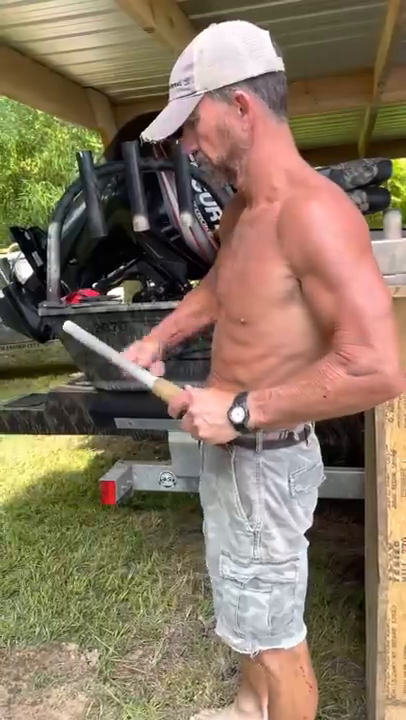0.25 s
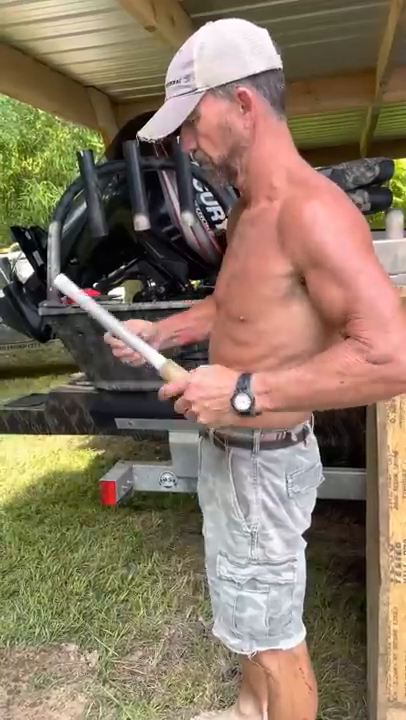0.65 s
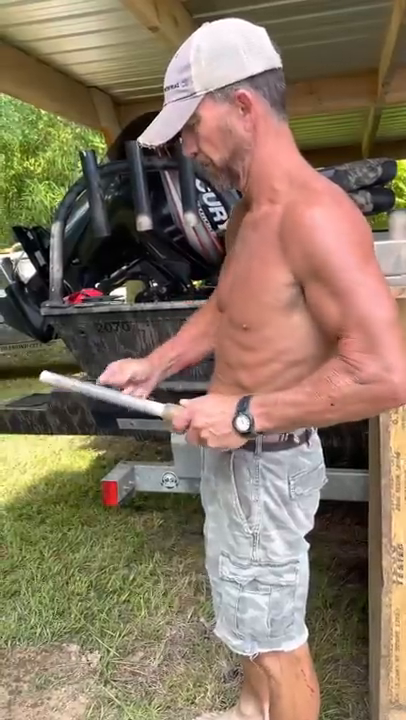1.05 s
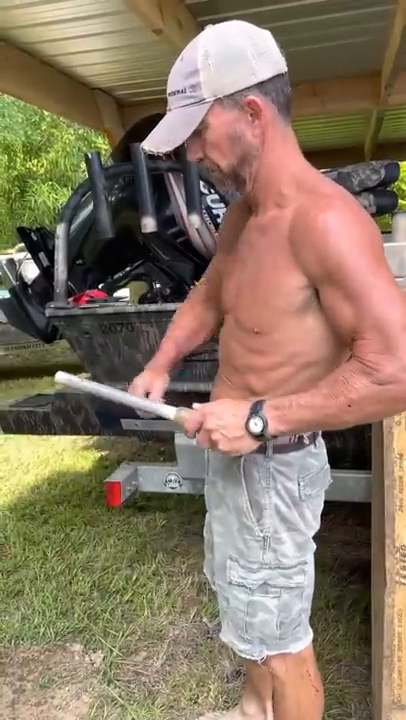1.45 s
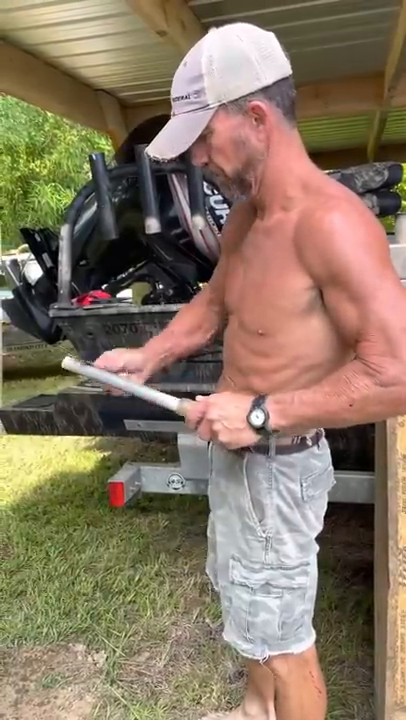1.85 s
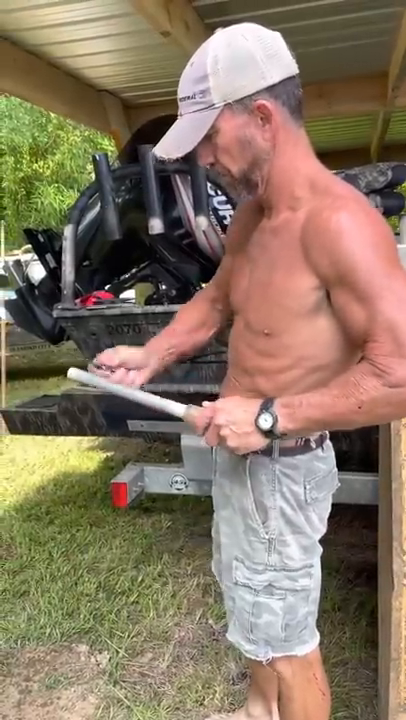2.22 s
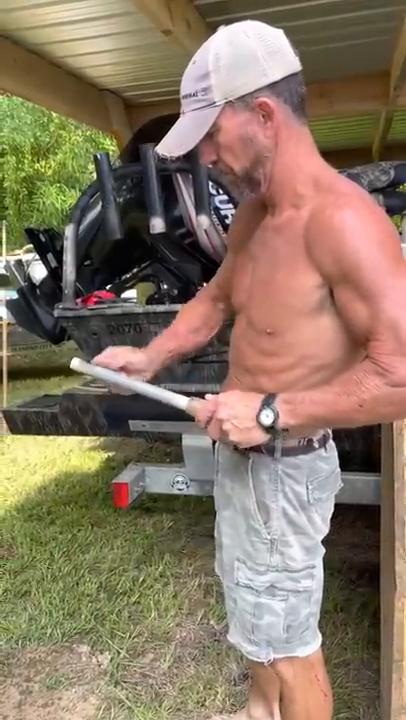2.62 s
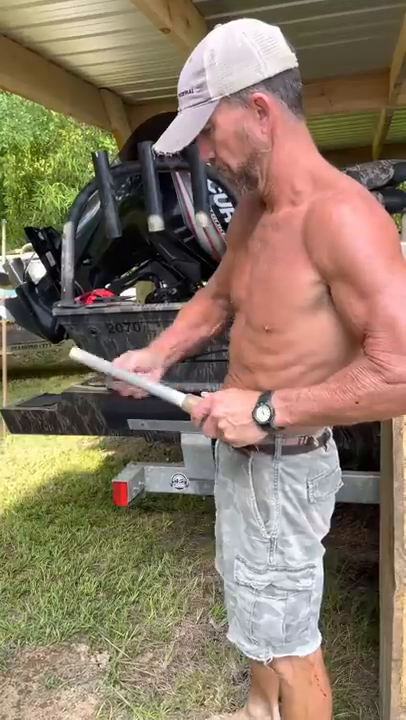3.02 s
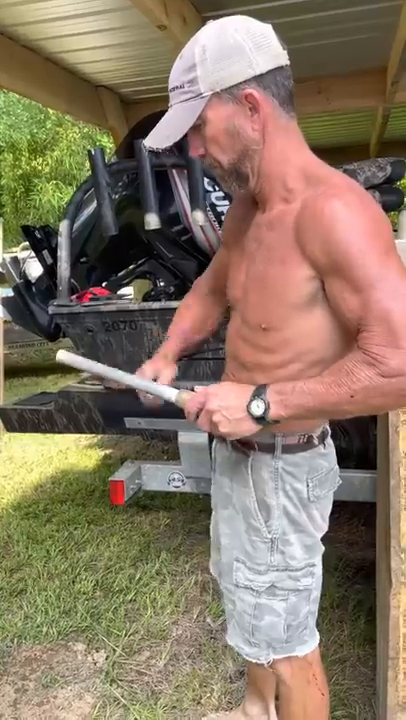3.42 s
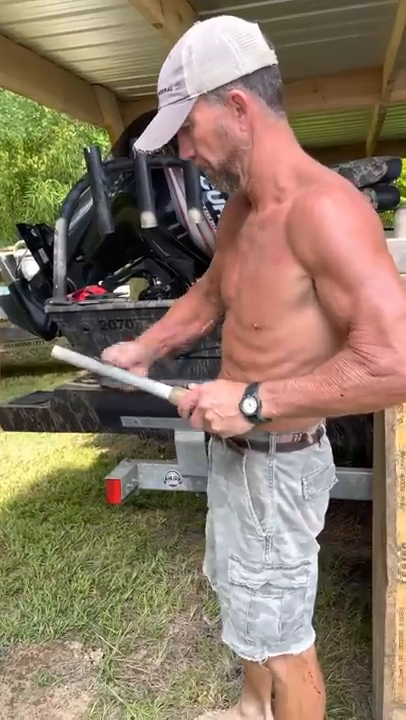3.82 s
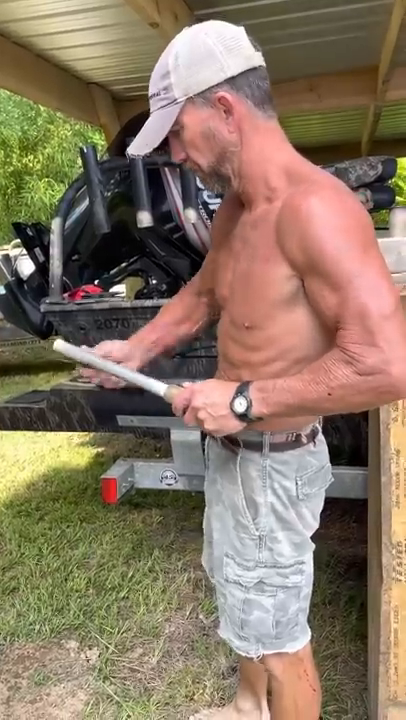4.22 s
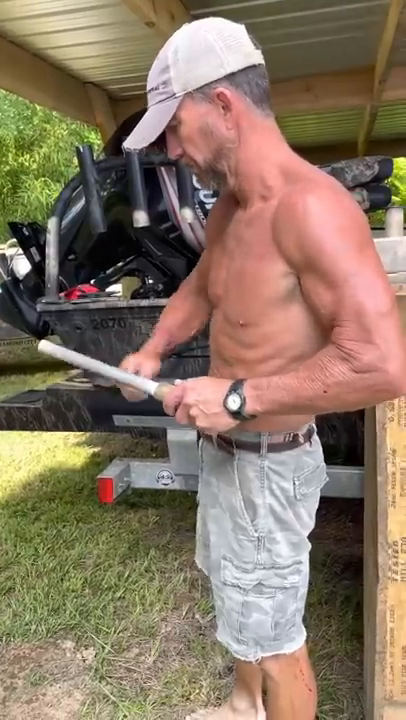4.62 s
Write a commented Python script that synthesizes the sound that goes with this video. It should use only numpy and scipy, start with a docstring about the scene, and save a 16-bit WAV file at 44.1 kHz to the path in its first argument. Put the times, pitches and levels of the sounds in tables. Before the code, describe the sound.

Close metallic honing: bright scrapes and raspier return strokes with small steel clinks, an early pause with bird chirps, then steady rhythm.

```python
"""A knife is honed on a hand-held rod under a carport roof, about three strokes a second.
The blade clinks onto the rod (blow and ringing modes), scrapes along it and is drawn back with
a longer rasp (uneven noise through moving resonances). Small birds call from the trees as gliding
sines, over filtered-noise air and rumble, a faint sine hum, soft low bumps and a thin sizzle."""
import sys
import numpy as np
from scipy import signal
from scipy.fft import rfft, irfft
from scipy.io import wavfile
from scipy.ndimage import uniform_filter1d

SR = 44100
rng = np.random.default_rng(int(sys.argv[2]) if len(sys.argv) > 2 else 0)


def store_pcm(level_fs):
    """Save levels as 16-bit WAV."""
    pcm = np.round(np.clip(level_fs, -1, 1) * 32767).astype(np.int16)
    wavfile.write(sys.argv[1], SR, np.atleast_2d(pcm).T)


N = 214715
TIME_S = np.arange(N) / SR

# outdoor air spectrum: (frequency [Hz], relative density [dB per Hz])
AIR_SPECTRUM = [(15, -50.5), (25, -52.5), (114, -2), (217, -4.5), (344, -11), (1130, -24), (1440, -21),
                (1890, -23), (2480, -25.5), (2910, -28.5), (3340, -26), (3720, -23.5), (4740, -37),
                (11600, -42.5), (16000, -102)]
# hum lines: (frequency [Hz], level [dB])
HUM_LINES = [(236, -70), (295, -70.5), (587, -88)]
# low rumble level, which dips briefly near 1.6 s: (time [s], relative level [dB])
RUMBLE_LEVEL = [(0, -56), (.3, -68), (1.15, -65.5), (1.5, -73.5), (1.63, -105), (1.78, -70), (2.8, -64),
                (4.2, -70.5), (4.35, -61), (4.86, -64.5)]
# blade pushed along the rod: (start [s], speeding up [s], slowing down [s], relative level [dB],
# relative fizz [dB], relative low rasp [dB], blade resonance [Hz])
PUSH_STROKES = [ (0.091, 0.0073, 0.034, -47.5, 7, -1.5, 2410), (1.089, 0.018, 0.088, -51, -1, 7, 2266),
                (1.482, 0.007, 0.01, -42, 7.5, -7.5, 2345), (1.502, 0.04, .02, -44, -12.5, 5.5, 2450),
                (1.768, 0.044, 0.045, -37.5, -3.5, -10.5, 2185),
                (2.306, 0.017, 0.034, -41.5, -10.5, -7, 2007),
                (2.587, 0.0025, 0.018, -50.5, -2.5, -5, 1900), (2.863, 0.017, 0.036, -52, 3, -7.5, 2400),
                (3.188, 0.0075, 0.045, -35, 1.5, -4.5, 2280), (3.486, 0.024, 0.034, -34, -1, -1, 2416),
                (3.783, 0.05, 0.016, -32.5, 1, -2.5, 2033), (4.1, 0.029, 0.014, -35, -4.5, 3, 2390),
                (4.394, 0.018, 0.044, -32, 1.5, -1.5, 2052), (4.711, 0.015, 0.041, -50, 4, 5, 2400), ]
# blade drawn back: columns as PUSH_STROKES
PULL_STROKES = [ (0.0, .004, 0.007, -49.5, -7.5, 11, 2440), (0.166, 0.095, 0.03, -35, -4, 2.5, 2493),
                (1.256, 0.071, 0.055, -37.5, -3, -1, 2250), (1.587, 0.071, 0.057, -35.5, -5, 0, 2625),
                (1.892, 0.078, 0.066, -36.5, -2, -3, 2230), (2.05, 0.037, 0.0042, -40.5, 11.5, -1, 2450),
                (2.386, 0.059, 0.0095, -44, 5.5, -7.5, 2260),
                (2.618, 0.081, 0.048, -35.5, -3.5, -0.5, 2254), (2.952, 0.084, 0.058, -36.5, -4, -1, 2524),
                (3.28, 0.086, 0.039, -36.5, -1.5, -1, 2280), (3.58, 0.082, 0.059, -35, -5.5, -2.5, 2555),
                (3.88, 0.09, 0.042, -36.5, -2.5, 2, 2600), (4.194, 0.083, 0.041, -35, -5, 2.5, 2580),
                (4.487, .088, 0.04, -35.5, -3, 3.5, 2715), (4.792, 0.076, 0.018, -38.5, -5.5, 4, 2610), ]
# stroke at first contact and at lift-off, against its fastest moment:
# (level [dB], fizz [dB], low rasp [dB], blade resonance [ratio])
PUSH_ENDS = [(-5, -6.5, 4, 1.2), (-5, -8, 1, 1.14)]
PULL_ENDS = [(-25, -17.5, 10.5, 0.95), (-8, 6.5, -7.5, 0.972)]
# steel spectrum in each direction and under a blow: (frequency [Hz], relative density [dB per Hz])
PUSH_SPECTRUM = [(350, -39.5), (700, -43.5), (1300, -15.5), (1750, -25), (2100, -4), (2600, -2),
                 (3000, -10), (3950, 1.5), (4500, -8.5), (6600, -10.5), (8300, 0), (10000, -8),
                 (12000, -10), (13000, -47.5), (16000, -47)]
PULL_SPECTRUM = [(350, -53), (950, -29.5), (1500, -10.5), (1850, -15), (2400, 4), (3000, -5), (3800, 1),
                 (4600, -8), (6600, -14.5), (8500, -4), (10000, -10), (11900, -17.5), (13000, -53),
                 (16000, -37)]
CLINK_SPECTRUM = [(200, -33.5), (700, -27), (1100, -14), (1700, -23.5), (2300, 1.5), (3000, -17.5),
                  (3950, -1), (5000, -7.5), (6700, -7.5), (8400, 8), (9400, 6.5), (10300, 1.5),
                  (12000, -11), (13500, -24.5), (16000, -34)]
# resonances gliding with the contact point: (ratio to the lowest blade resonance, width [Hz],
# level [dB], extra glide [octaves per s])
PUSH_GLIDES = [(1, 140.4, -4, 0), (1.8, 177.4, -26, 1), (3.8, 400, -7.5, 1)]
PULL_GLIDES = [(1, 224, -1.5, 0), (1.45, 285, -15, 5.5), (2.198, 439, -17.5, -0.5), (3.4, 604, -39.5, 8.5)]
# modes of blade and rod: (nominal frequency [Hz], relative level [dB], t60 [s])
STEEL_MODES = [(1152, -36, .05), (1950, -31, .09), (2180, -19.5, 0.063), (3746, 1.5, 0.039),
               (4206, 12.5, 0.013), (5030, -35, 0.064), (7340, -4, .06), (8000, -17, .07), (8190, -26, .07),
               (8050, -2, 0.033), (8150, 5, 0.087), (9500, -3, 0.047), (11200, 9.5, 0.051)]
# blade lands on the rod: (time [s], relative strength [dB], then against the bright ping:
# mid ring [dB], low ring [dB], knock [dB])
CLINK_EVENTS = [(.090, -12, 1, 5, 1), (1.0877, -16.5, 0.5, 15.5, -16), (1.4805, -23, 10.5, 5.5, 12),
                (1.762, -19.5, 7, 5.5, 14.5), (2.056, -44, -3, 6, 31), (2.246, -54, 5, -6, -20),
                (2.3029, -23, 13, 6.5, 10), (2.5849, -22, 16.5, 36, 15), (2.832, -56, 0, -9.5, 1),
                (2.8605, -16, 7, 9, -0.5), (3.1837, -14.5, 6.5, 7, -2.5), (3.483, -20.5, 10.5, 6, 14),
                (3.779, -22.5, 4.5, -7, 2), (4.098, -15.5, 2, 3, -5), (4.3916, -13, -2, -4, -3),
                (4.7099, -17, 7.5, 5, -2)]
# soft low bumps: (time [s], level [dB], mid pitch [Hz])
BUMP_EVENTS = [(0.203, -51, 170), (0.569, -41.5, 141), (0.586, -38.5, 173), (0.711, -47, 167),
               (.999, -42.5, 211), (1.097, -45, 181), (1.161, -45.5, 252), (1.314, -37.5, 244),
               (1.497, -43.5, 232), (1.757, -45, 211), (2.709, -40, 214), (2.826, -37.5, 197),
               (3.138, -43.5, 160), (3.246, -40.5, 208), (3.52, -44.5, 205), (3.753, -40, 251),
               (3.927, -39.5, 213), (4.056, -40, 247), (4.327, -40, 158)]
# bird notes: (time [s], length [s], start pitch [Hz], end pitch [Hz], relative level [dB])
BIRD_NOTES = [(0.435, 0.069, 6200, 5290, -61.5), (0.454, 0.035, 5500, 4130, -59),
              (0.709, 0.03, 4510, 3700, -58), (0.715, 0.048, 3600, 3640, -57.5),
              (0.762, 0.024, 3250, 2580, -61), (0.915, 0.072, 1860, 2008, -64.5),
              (1, 0.057, 5020, 4440, -61), (1.009, 0.02, 4600, 3630, -57),
              (1.066, 0.023, 3700, 3190, -52.5), (1.212, 0.045, 3550, 3420, -56.5),
              (1.252, 0.05, 3350, 2640, -47), (1.384, 0.087, 3254, 2650, -54),
              (2.247, .045, 5560, 4750, -68), (2.512, 0.03, 5600, 4900, -66),
              (2.819, 0.026, 4510, 3890, -64)]
# microphone ports, phase: (frequency [Hz], left lead [rad])
PORT_PHASE = [(1300, -.3), (2000, .1), (3000, 1), (4500, .65), (6500, .55), (7500, 1.3), (8600, -.1),
              (9500, -1.9), (10300, -3.15), (11900, -6.2), (12700, -6.6), (13500, -9.3), (16000, -12.5)]
# microphone ports, balance: (frequency [Hz], left minus right [dB])
PORT_BALANCE = [(60, -1), (500, 5.5), (1300, 2), (2400, 2.5), (4400, 3.5), (7500, 3.5), (8800, 0.3),
                (15000, 0)]
# carport decay: (frequency [Hz], t60 [s])
CARPORT_DECAY = [(500, 1), (2500, 0.33), (5000, 0.4), (8500, 0.4), (11000, 0.051), (14000, 0.11)]


def amp(db):
    """Decibels to gain."""
    return 10 ** (np.asarray(db) / 20)


def unit(x):
    """Scales to an rms of one."""
    return x / np.sqrt(np.mean(x ** 2) + 1e-20)


def steady(x, size):
    """Scales to a running rms of one, keeping the fine grain."""
    return x / np.sqrt(uniform_filter1d(x ** 2, size) + 1e-12)


def read(points, hz):
    """Reads a table on a log-frequency axis."""
    f_hz, value = np.transpose(points)
    return np.interp(np.log(hz + 1), np.log(f_hz + 1), value)


def add(mix, start_s, sound):
    """Lays a sound into the mix at start_s."""
    part = mix[max(round(start_s * SR), 0):][:len(sound)]
    part += sound[:len(part)]


def colour(x, points, size=2048):
    """Causal (minimum-phase) filter with the given spectrum."""
    log_gain = np.log(amp(read(points, abs(np.fft.fftfreq(size, 1 / SR)))))
    taps = np.fft.ifft(np.exp(np.conj(signal.hilbert(log_gain)))).real
    return signal.fftconvolve(x, taps)[:len(x)]


def band(x, lo_hz, hi_hz, order=4):
    """Band-pass filter."""
    edges_hz = [lo_hz, min(hi_hz, .49 * SR)]
    return signal.sosfilt(signal.butter(order, edges_hz, "band", fs=SR, output="sos"), x)


def drift(rate_per_s, size):
    """Random wander: normal values at rate_per_s joined by straight lines."""
    at = np.arange(size) * rate_per_s / SR
    return np.interp(at, np.arange(8192), rng.standard_normal(8192))


def background(apart=0.59, air_db=-62.5, hiss_db=-1, rumble_db=-1, lumps_per_s=20, lumps_db=5.5):
    """Filtered-noise air, a rumble in random lumps and a faint wavering hum."""
    noise = rng.standard_normal((2, N))
    air = amp(air_db) * np.array([unit(colour(n, AIR_SPECTRUM)) for n in noise])
    swell_db = np.interp(TIME_S, *np.transpose(RUMBLE_LEVEL)) + lumps_db * drift(lumps_per_s, N)
    rumble = np.array([unit(band(a, 49, 200)) for a in air]) * amp(swell_db + rumble_db)
    mid, side = amp(hiss_db) * band(air, 283, 22000, order=3) + rumble
    hum = np.zeros(N)
    for hz, db in HUM_LINES:
        wavering_hz = hz * (1 + 0.00576 * drift(12, N))
        hum += amp(db) * unit(np.sin(2 * np.pi * np.cumsum(wavering_hz) / SR))
    return np.array([mid + apart * side, mid - apart * side]) + hum


def gesture(rise_s, fall_s, ends, swell_power=1.79, lift_db_per_s=637.5, lift_s=0.059):
    """The hand speeds up, slows down and lifts off; level, colour and blade resonance follow it."""
    t = np.arange(0, rise_s + fall_s + lift_s, 1 / SR)
    early = np.clip(1 - t / rise_s, 0, 1)
    late = np.clip((t - rise_s) / fall_s, 0, 1)
    (db_in, fizz_in, low_in, ratio_in), (db_out, fizz_out, low_out, ratio_out) = ends
    lifted_s = np.maximum(t - rise_s - fall_s, 0)
    # rounded around the fastest moment, dying away as the edge leaves the rod
    level_db = db_in * early ** swell_power + db_out * late ** swell_power - lift_db_per_s * lifted_s
    fizz_db = fizz_in * early + fizz_out * late
    low_db = low_in * early + low_out * late
    return t, level_db, fizz_db, low_db, ratio_in ** early * ratio_out ** late


def resonate(x, hz, width_hz):
    """A resonance that follows the curve hz."""
    turn = np.exp(2j * np.pi * np.cumsum(hz) / SR)
    r = np.exp(-np.pi * width_hz / SR)
    return (turn * signal.lfilter([(1 - r) ** 2], [1, -2 * r, r * r], x / turn)).real


def steel(x, size=6000):
    """Rings the modes of blade and rod, which the changing contact detunes a little."""
    t = np.arange(size) / SR
    detune = 1 + .006 * rng.standard_normal(len(STEEL_MODES))
    ring = np.zeros(size)
    for (hz, db, t60_s), ratio in zip(STEEL_MODES, detune):
        ring += amp(db - 60 * t / t60_s) * np.sin(2 * np.pi * hz * ratio * t)
    return signal.fftconvolve(x, ring / np.linalg.norm(ring))[:len(x)]  # unit energy


def contact_point(x, travel, node_db, node_hz=190, patch_db=3.5):
    """Bending waves answer unevenly as contact slides past their nodes and over worn patches."""
    hz, t, z = signal.stft(x, SR, nperseg=256, noverlap=192)
    free_length = 1 - travel * t / t[-1]
    turns = np.sqrt(hz / node_hz)[:, None] * free_length + rng.normal(0, 0.3)
    nodes = np.cos(2 * np.pi * turns)
    wear = rng.standard_normal((len(hz), 260))[:, :len(t)]
    patches = unit(uniform_filter1d(uniform_filter1d(wear, size=3, axis=0), size=12, axis=1))
    z = z * amp(node_db * nodes + patch_db * patches)
    return signal.istft(z, SR, nperseg=256, noverlap=192)[1][:len(x)]


def stroke(row, ends, spectrum, glides, travel, node_db, ring_db, fizz_db, chatter_db, grit_db):
    """The edge catches on tiny ridges: uneven noise excites steel and gliding blade resonances."""
    start_s, rise_s, fall_s, level_db, bright_db, body_db, blade_hz = row
    t, swell_db, brighten_db, low_db, bend = gesture(rise_s, fall_s, ends)
    size = 16384
    # fine and coarse unevenness of the friction
    uneven_db = grit_db * drift(2800, size) + chatter_db * drift(260, size)
    ridges = (rng.standard_normal((5, size)) * amp(uneven_db))[:, :len(t)]
    scrape = unit(colour(ridges[0], spectrum))
    scrape = scrape + amp(ring_db) * unit(steel(scrape))
    # the free length of the blade changes as it slides, so its resonances move
    for drive, (ratio, width_hz, db, glide) in zip(ridges[1:], glides):
        hz = ratio * blade_hz * bend * 2 ** (glide * (t - rise_s))
        scrape = scrape + amp(db) * unit(resonate(drive, hz, width_hz))
    scrape = contact_point(scrape, travel, node_db)
    # range of the blade's lowest resonance
    low_filter = signal.butter(2, (1950, 2900), "band", fs=SR, output="sos")
    low = signal.sosfiltfilt(low_filter, scrape)
    rasp = steady(band(scrape + (amp(body_db + low_db) - 1) * low, 250, 6540), size=600)
    fizz = steady(band(scrape, 4980, 20000), size=600) * amp(bright_db + brighten_db + fizz_db)
    fade = np.clip(np.minimum(t, t[-1] - t) / .004, 0, 1)
    return start_s, amp(level_db + swell_db) * (rasp + fizz) * fade


def honing():
    """Pushes have more fizz; pulls chatter more, the free blade shortening as they go."""
    pushes, pulls = np.zeros(N), np.zeros(N)
    for row in PUSH_STROKES:
        add(pushes, *stroke(row, PUSH_ENDS, PUSH_SPECTRUM, PUSH_GLIDES, travel=-0.17, node_db=3.7,
                            ring_db=-11.5, fizz_db=3.5, chatter_db=-1.5, grit_db=1.0))
    for row in PULL_STROKES:
        add(pulls, *stroke(row, PULL_ENDS, PULL_SPECTRUM, PULL_GLIDES, travel=0.5, node_db=3.0,
                           ring_db=-11, fizz_db=0, chatter_db=3.8, grit_db=0.0))
    return pushes + amp(-2.2) * pulls


def clinks(ring_db=-11, level_db=22.5, size=6000):
    """Steel meets steel in a sharp blow and a tiny rattle, then rings briefly, damped by the hands."""
    out, t = np.zeros(N), np.arange(size) / SR
    hz = np.fft.rfftfreq(size, 1 / SR)
    # higher bending waves run faster: the bright ping arrives before the low ring
    dispersion = np.exp(-2j * np.pi * np.sqrt(hz / 50))
    for start_s, db, mid_db, low_db, knock_db in CLINK_EVENTS:
        decay = (np.exp(-t / .0015) + .08 * np.exp(-t / 0.009)) * (t > .0004)
        rattle = rng.choice([-1., 1.], size) * decay
        impact = signal.unit_impulse(size) + amp(1) * rattle / np.linalg.norm(rattle)
        # where the blade lands decides which of its bending ranges answer
        place = [(800, knock_db), (2000, low_db), (3800, mid_db), (7500, 0.0058)]
        dispersed = irfft(rfft(impact) * dispersion, size)
        blow = colour(colour(dispersed, CLINK_SPECTRUM), place)
        clink = unit(blow) + amp(ring_db) * unit(steel(blow))
        add(out, start_s, amp(db + level_db) * clink / np.linalg.norm(clink) / 2)
    return out


def bumps(swell_s=0.0023, sag=0.114, pat_db=-13, pat_hz=360, size=3000):
    """Dull, quickly damped low sines whose pitch sags, each with a short higher pat."""
    out, t = np.zeros(N), np.arange(size) / SR
    swell = (t / swell_s) ** 3 * np.exp(-t / swell_s)
    swell = swell / swell.max()
    for start_s, db, hz in BUMP_EVENTS:
        turns = np.cumsum(hz * (1 + sag * (2 * np.exp(-t / 0.029) - 1))) / SR
        thud = swell ** 2 * np.sin(2 * np.pi * turns)
        pat = amp(pat_db) * swell ** 3 * np.sin(2 * np.pi * (pat_hz * t + rng.random()))
        add(out, start_s, amp(db) * (thud + pat))
    return out


def birds(trill=0.027, trill_per_s=450, flutter_db=2):
    """Short, mostly falling sine whistles, roughened by a quick irregular trill."""
    out = np.zeros(N)
    for start_s, length_s, start_hz, end_hz, db in BIRD_NOTES:
        size = int(length_s * SR)
        hz = np.geomspace(start_hz, end_hz, size) * (1 + trill * drift(trill_per_s, size))
        swell = signal.windows.tukey(size, .5) * amp(flutter_db * drift(200, size))
        add(out, start_s, amp(db) * unit(np.sin(2 * np.pi * np.cumsum(hz) / SR) * swell))
    return out


def faint_sizzle(start_s=0.45, length_s=0.42, level_db=-77):
    """A thin high band of noise swells and fades in the pause."""
    out, size = np.zeros(N), int(length_s * SR)
    hiss = unit(band(rng.standard_normal(N), 7800, 10000, order=2))[:size]
    add(out, start_s, amp(level_db) * hiss * signal.windows.hann(size))
    return out


def ports(x):
    """Near sound reaches the two microphone ports with differing phase and level by frequency."""
    hz = np.fft.rfftfreq(N, 1 / SR)
    half = amp(read(PORT_BALANCE, hz) / 2) * np.exp(.5j * read(PORT_PHASE, hz))
    return irfft(rfft(x) * np.array([half, 1 / half]), N)


def echoes(x, decay, first_s, size=30000):
    """Scattered reflections, different at each port, each band dying at its own speed."""
    sparse = (rng.random((2, size)) < .08) * (np.arange(size) > first_s * SR)
    taps = rng.standard_normal((2, size)) * sparse
    hz, t, z = signal.stft(taps, SR, nperseg=256)
    tail = signal.istft(z * amp(-60 * t / read(decay, hz)[:, None]), SR, nperseg=256)[1]
    return signal.fftconvolve(x[None], tail / np.linalg.norm(tail[0]), axes=1)[:, :N]


def scene():
    """Knife and rod under the roof, birds farther off."""
    knife, song = honing() + clinks(), birds()
    # reflections off the body and the posts: (frequency [Hz], t60 [s])
    nearby = amp(-9) * echoes(knife, [(500, .07), (4000, 0.026), (9000, 0.024)], first_s=.003)
    roof = amp(-21.5) * echoes(knife, CARPORT_DECAY, first_s=0.0024)
    near = ports(knife + bumps()) + nearby + roof
    far = amp(-8) * song + echoes(song, [(2000, 0.37), (6000, 0.71)], first_s=0.0079)
    return near + far + faint_sizzle() + background()


def record(dry, edge_hz=16300):
    """The band limit of the recorder: a linear-phase low-pass."""
    taps = signal.firwin(511, edge_hz, window=("kaiser", 9), fs=SR)
    return signal.oaconvolve(dry, taps[None], "same")


dry = scene()
out = record(dry)
store_pcm(out)
```